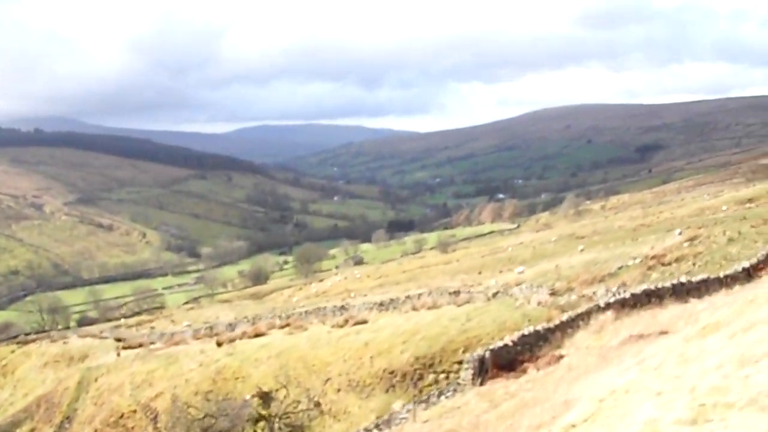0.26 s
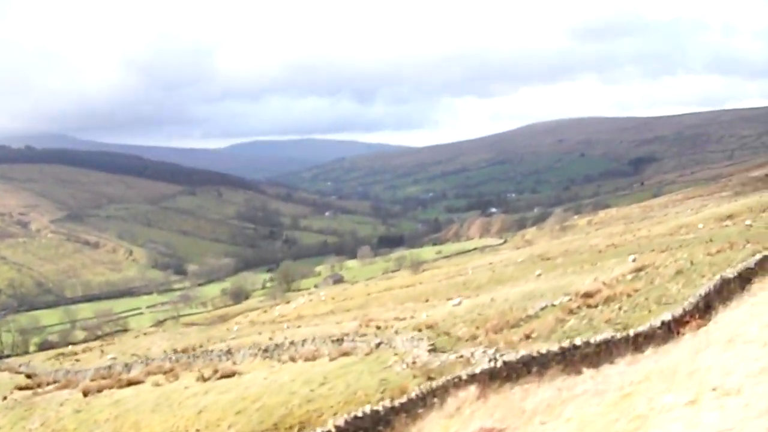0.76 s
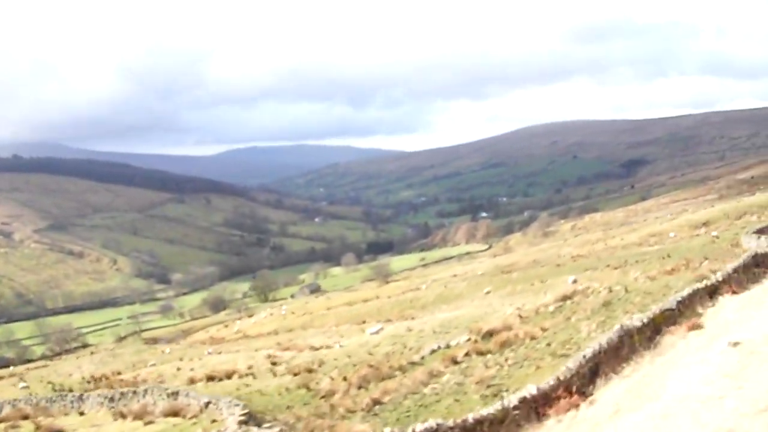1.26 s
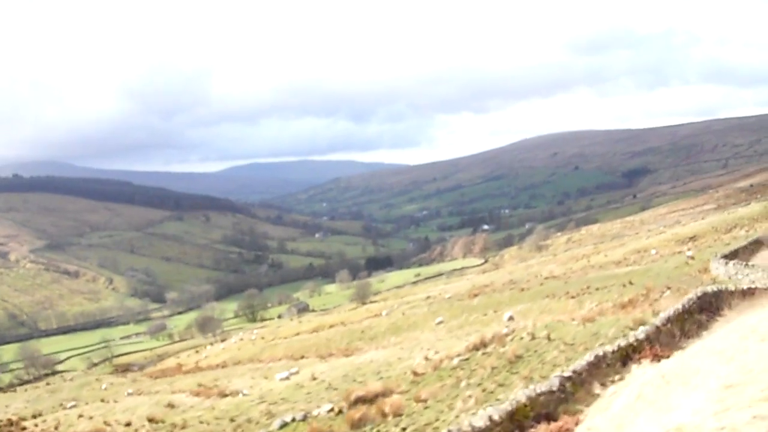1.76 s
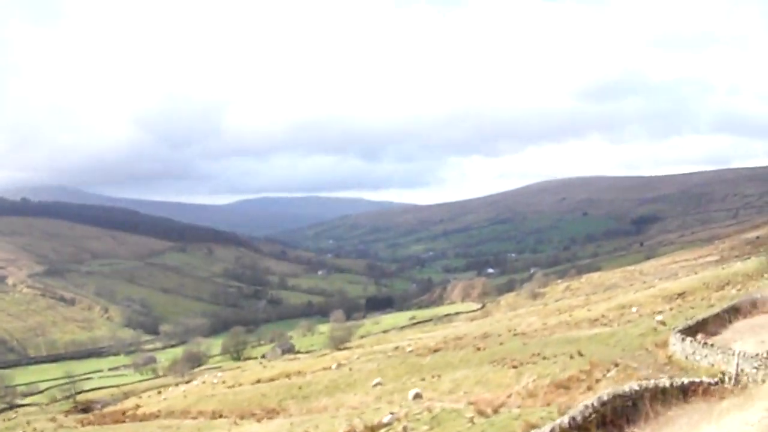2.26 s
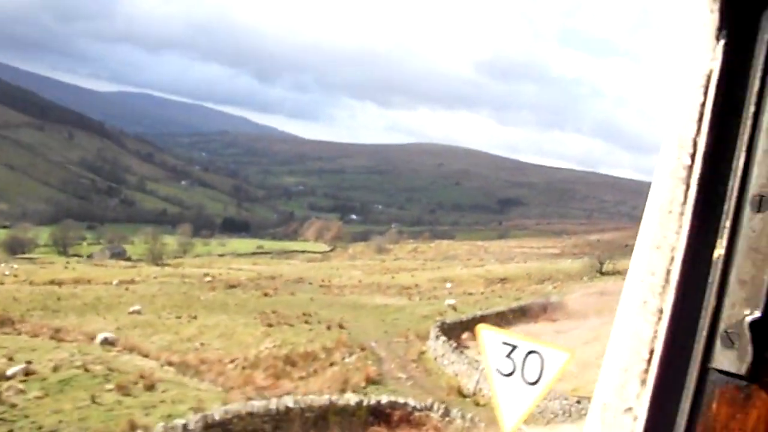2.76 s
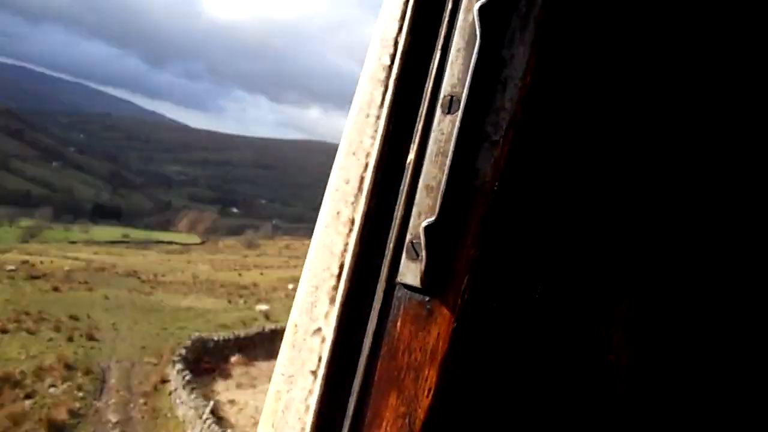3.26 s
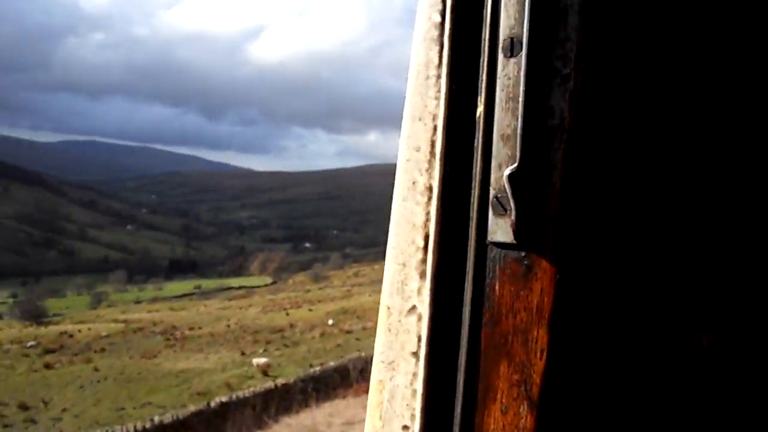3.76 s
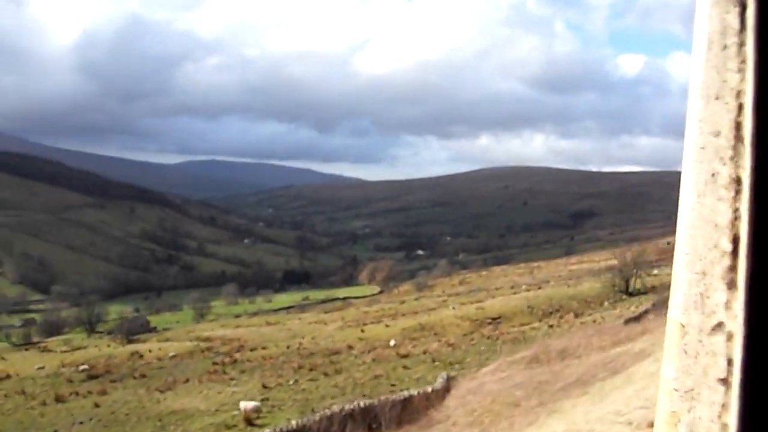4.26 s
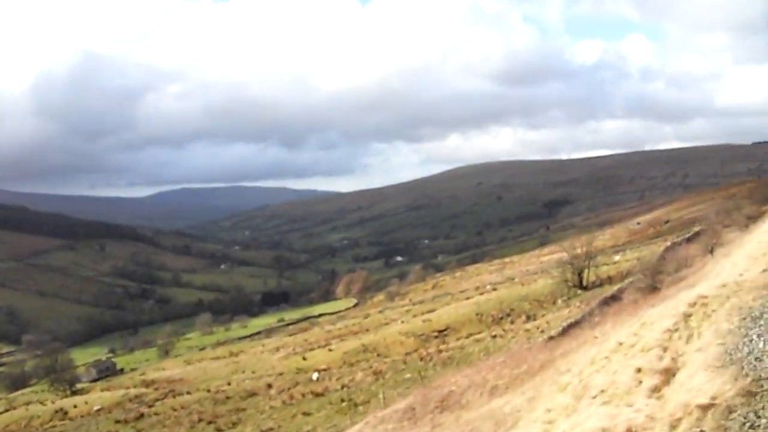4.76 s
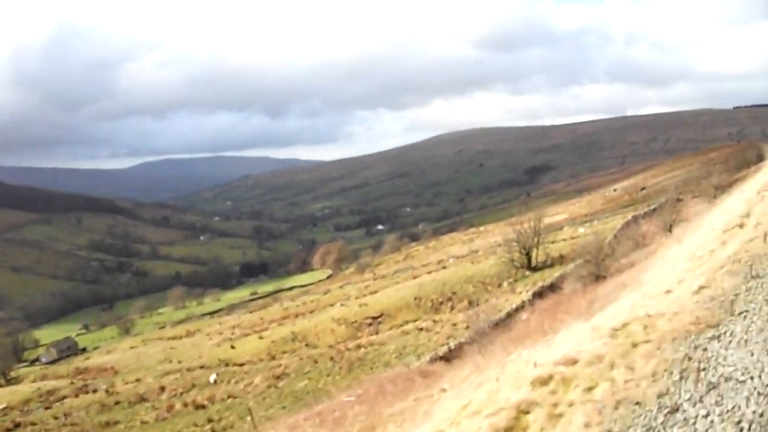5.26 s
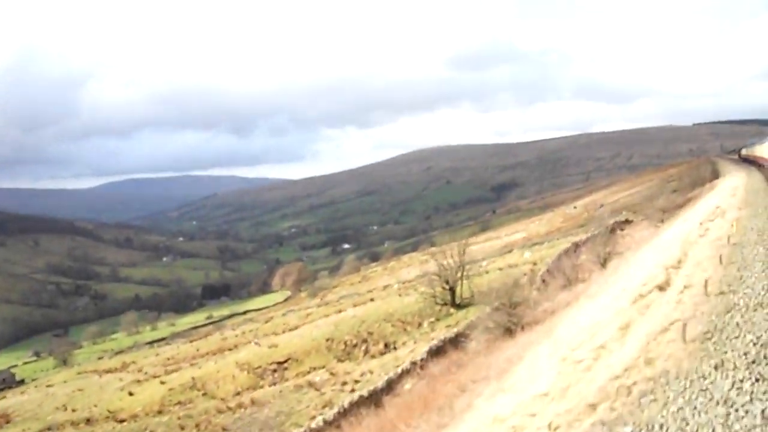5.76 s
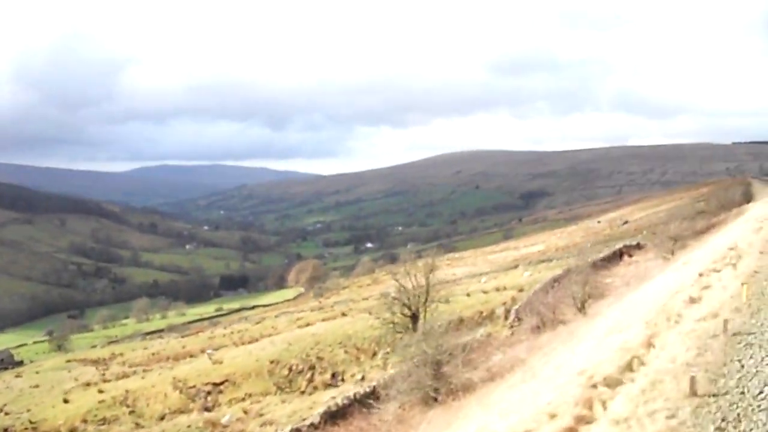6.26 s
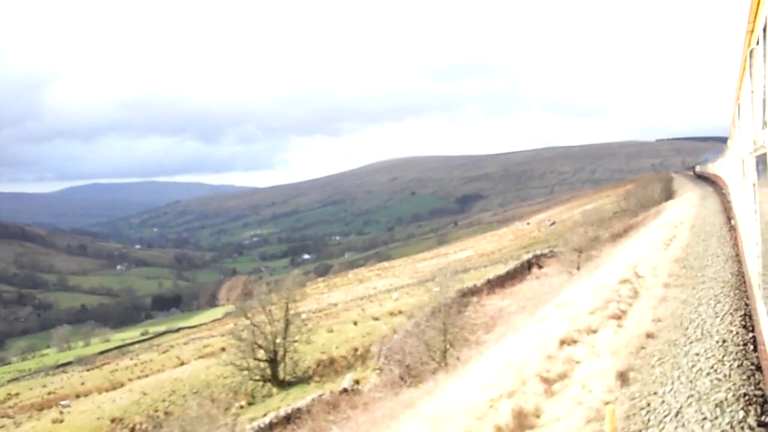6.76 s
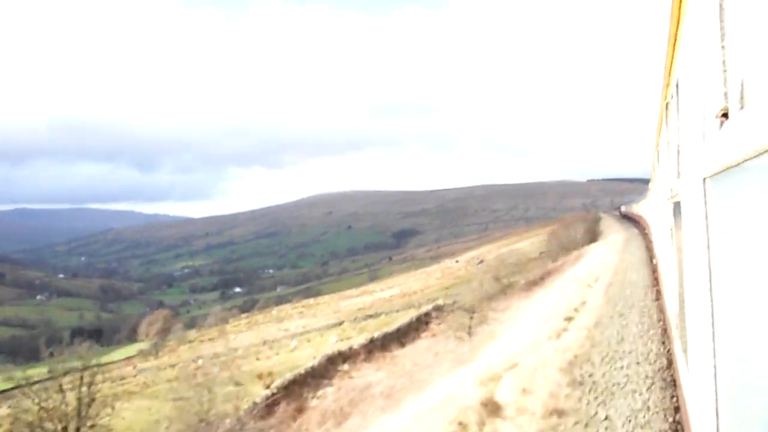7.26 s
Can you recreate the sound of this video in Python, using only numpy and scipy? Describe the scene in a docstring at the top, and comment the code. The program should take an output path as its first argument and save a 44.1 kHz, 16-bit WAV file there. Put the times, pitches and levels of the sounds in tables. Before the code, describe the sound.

Rough wind blasts and rasps on a microphone outside a moving train window, ducks away to soft carriage rolling, then roars back harder.

```python
"""Rough wind buffets and rasps on a stereo microphone held out of the window of a moving train.
Turbulent air presses on each port on its own: spectra of big and small eddies are swept past it at the air's speed,
and overload drives the capsule into its stops. Dry crackles mark the flow snapping onto a port.
For a while the window frame shelters the ports and the rolling of the carriage shows: resonant noise, with a hum.
"""
import sys
import numpy as np
from scipy import signal
from scipy.fft import rfft, irfft, next_fast_len
from scipy.io import wavfile
from scipy.ndimage import uniform_filter1d, map_coordinates

SR = 44100
rng = np.random.default_rng(int(sys.argv[2]) if len(sys.argv) > 2 else 0)


def transcribe(u):
    """Save the signal u as a 16-bit wav file named by the first command-line argument.

    u: samples, shape (n,) or (channels, n), limited to [-1, 1]; the rate is SR.
    q: integer samples, one column per channel.
    """
    v = np.clip(np.atleast_2d(u).T, -1, 1)
    q = np.round(v * 32767).astype(np.int16)
    wavfile.write(sys.argv[1], SR, q)


N = 331632  # samples in the scene


def amp(db):
    """Level to pressure ratio: 20 dB is a factor of ten."""
    return 10 ** (np.asarray(db) / 20)


def unit(x):
    """Normalisation to a root-mean-square of 1."""
    return x / np.sqrt(np.mean(x ** 2) + 1e-20)


def along(points, hz):
    """Linear interpolation of (Hz, value) points on a logarithmic frequency axis."""
    f, v = np.transpose(points)
    return np.interp(np.log(hz + 1), np.log(f + 1), v)


def curves(rows):
    """Linear interpolation in time: one value per sample for each column after the seconds."""
    seconds, *columns = np.transpose(rows)
    t = np.arange(N) / SR
    return [np.interp(t, seconds, column) for column in columns]


def wobble(rate):
    """Slow random modulation: a spline through independent normal knots, rate of them a second."""
    knots = rng.standard_normal(int(N * rate / SR) + 4)
    return map_coordinates(knots, [np.arange(N) * rate / SR])


def flicker(rate):
    """Random telegraph-like modulation: a level that jumps at irregular moments, about rate times a second."""
    jumps = np.cumsum(rng.random(N) < rate / SR)
    levels = rng.standard_normal(N + 1)
    return uniform_filter1d(levels[jumps], size=30)


def filtered(x, response):
    """Linear filtering: the spectrum is multiplied by a response, a function of frequency in Hz."""
    m = next_fast_len(x.shape[-1] + 8192)
    spectrum = rfft(x, m) * response(np.fft.rfftfreq(m, 1 / SR))
    return irfft(spectrum, m)[..., :x.shape[-1]]


def wind(port, side, full_db, tear_db, swell_db, coarse, buffet_full_db):
    """Turbulent pressure on one port; flow over its edge tears off and re-attaches, less so when it is strong."""
    # Pressure spectra of the eddies at full air speed, before scaling to rms 1.
    # Each row: frequency in Hz, relative level in dB per Hz.
    big_eddies = [(10, -9), (35, 1), (70, 1), (130, -4.5), (400, -29), (1500, -47), (20000, -83)]
    small_eddies = [(10, -5.5), (100, -2), (380, 0), (700, -5), (1500, -12.5), (6000, -28.5), (11000, -37),
                    (20000, -68.5)]
    # Moments when the flow lets go of the right port. Each row: start in seconds, length in ms.
    lulls = [(0.242, 9.2), (0.394, 10.2), (0.437, 11.3), (0.5, 8.2), (0.585, 10.1), (0.727, 5.9), (1.4, 7),
             (1.889, 9), (1.989, 7.28), (2.157, 8.95), (2.235, 5.97), (4.966, 31.7)]
    lull_db = -6

    buffet_db, calm_db = curves(port)
    calm_power = amp(2 * (calm_db + swell_db * wobble(35)))
    rasp_db = 10 * np.log10(calm_power + gusts(side))

    unsteady = np.clip(-rasp_db / 18, .5, 1.1)
    tearing = coarse * flicker(rate=150) + .8 * flicker(rate=450)
    kicks = flicker(rate=650)
    # the air lurches for a millisecond or two
    lurches = .25 * kicks + .8 * np.clip(kicks - 1.2, 0, 1.1)
    jerks = 2 ** (unsteady * lurches)

    lull_gate = held([(s, s + ms / 1000, 0, 0) for s, ms in lulls])
    letting_go = lull_db * (side < 0) * lull_gate
    rasp_db = rasp_db + tear_db * unsteady * tearing + letting_go

    buffet = eddies(big_eddies, buffet_db + 1.8 * wobble(14), buffet_full_db, octave_db=21, jerks=jerks)
    rasp = eddies(small_eddies, rasp_db, full_db, octave_db=12., jerks=jerks)
    return buffet + rasp


def eddies(spectrum, level_db, full_db, octave_db, jerks):
    """Frozen turbulence: a fixed pressure pattern is swept past the port, so faster air is louder and higher."""
    noise = rng.standard_normal(3 * N)
    pattern = unit(filtered(noise, lambda hz: amp(along(spectrum, hz))))
    # speed is 1 at full_db and doubles with every octave_db, apart from the jerks
    speed = np.clip(2 ** ((level_db - full_db) / octave_db) * jerks, .02, 2.5)
    position = np.cumsum(speed)
    return amp(level_db) * map_coordinates(pattern, [position])


def gusts(side):
    """Incoherent addition: the powers of the gusts and puffs that make one port rasp are summed."""
    # Gusts that strike one port and hold. Each row: start in seconds, end in seconds,
    # port (1 left, -1 right), rasp level in dB at the start and at the end, before tearing.
    gust_rows = [(0.0, 0.178, 1, -19, -19), (1.541, 1.765, 1, -13, -15), (2.103, 2.15, -1, -11, -18),
                 (2.104, 2.16, 1, -19, -22), (2.19, 2.302, -1, -18, -19), (4.788, 4.963, -1, -19, -15),
                 (4.841, 4.939, -1, -16, -17.5), (5.077, 5.255, 1, -11, -14), (5.105, 5.205, 1, -10, -8),
                 (5.297, 5.453, 1, -1, -9), (5.464, 5.633, 1, -3, -10), (5.64, 6.77, 1, -11, -10),
                 (5.7, 5.751, -1, -20, -17), (5.699, 5.89, 1, -4, -4), (5.9, 6.691, 1, -6, -11),
                 (6.805, 6.978, 1, -8, -7), (6.853, 6.919, 1, -8, -8), (6.998, 7.015, 1, -11.5, -12.5),
                 (7.034, 7.046, 1, -7, -9), (7.056, 7.166, 1, -9.5, -10.5), (7.252, 7.3, 1, -5, -9.5),
                 (7.356, 7.376, 1, -13, -8.5), (7.381, 7.408, 1, -7.5, -10.5),
                 (7.488, 7.52, 1, -18.5, -17.5)]
    # Short puffs on one port. Each row: start in seconds, port (1 left, -1 right), length in ms,
    # rasp level in dB at the start, before tearing.
    puff_rows = [(0.033, 1, 9.2, -12), (0.057, 1, 13.2, -11), (0.085, 1, 11.8, -14), (0.125, 1, 7.8, -15),
                 (0.158, 1, 19, -14), (0.197, 1, 4.5, -17), (0.261, 1, 13.3, -21), (0.339, 1, 8.3, -20),
                 (0.406, 1, 9.5, -19), (0.495, 1, 9.6, -19), (0.568, 1, 15.6, -17), (0.635, 1, 8.2, -16),
                 (0.654, 1, 14.1, -17), (0.682, 1, 12.5, -12), (0.723, 1, 5.9, -19), (0.982, 1, 11.8, -21),
                 (1.002, 1, 10.4, -19), (1.103, 1, 17, -20), (1.205, 1, 14.7, -15), (1.275, 1, 12.5, -15),
                 (1.319, 1, 11.6, -19), (1.373, 1, 14, -21), (1.583, 1, 16.7, -8), (1.851, 1, 10, -15),
                 (1.9, 1, 22.2, -19), (1.962, 1, 12.6, -17), (2.308, 1, 13.8, -25), (2.485, 1, 6.2, -21),
                 (2.512, 1, 7.6, -18), (2.546, 1, 19, -19), (2.578, -1, 16.7, -23), (2.639, 1, 9.6, -18),
                 (2.722, 1, 4.95, -23), (2.772, 1, 11, -19), (2.79, 1, 23.5, -18), (2.86, 1, 12.3, -25),
                 (4.195, 1, 16.7, -29), (4.315, 1, 18, -27), (4.453, 1, 8.5, -23), (4.54, 1, 7.8, -16),
                 (4.551, 1, 13, -18), (4.6, 1, 12, -17), (4.62, 1, 16, -16), (4.672, 1, 11.6, -20),
                 (4.73, 1, 7, -16), (4.733, -1, 5.5, -15), (5.428, -1, 7.6, -14), (5.462, -1, 17, -19),
                 (5.578, -1, 8.1, -19), (5.635, -1, 5, -16), (5.807, -1, 17.2, -18), (6.12, -1, 7.8, -15),
                 (6.785, 1, 16, -13), (7.013, -1, 5.85, -18.5), (7.044, -1, 19, -20), (7.18, 1, 7.6, -15.5),
                 (7.21, 1, 9.1, -13.5), (7.211, -1, 8.4, -18), (7.242, -1, 15, -17), (7.325, 1, 20, -18.5),
                 (7.362, -1, 11.7, -16), (7.417, 1, 8.1, -10), (7.438, 1, 10.5, -15.5), (7.455, -1, 5, -17)]
    puff_fade_db = -5  # a puff is strongest at its start

    long = [(start, end, first, last) for start, end, port, first, last in gust_rows if port * side > 0]
    short = [(s, s + ms / 1000, db, db + puff_fade_db) for s, port, ms, db in puff_rows if port * side > 0]
    return held(long + short)


def held(rows):
    """Power addition of stretches given as (start s, end s, first dB, last dB)."""
    power = np.zeros(N)
    for start, end, first_db, last_db in rows:
        span = slice(round(start * SR), round(end * SR))
        power[span] += amp(2 * np.linspace(first_db, last_db, len(power[span])))
    return edged(power)


def edged(x):
    """Finite response time of the flow: a running mean turns sudden steps into short slopes."""
    edge_s = .003  # how fast the flow takes hold or lets go
    return np.abs(uniform_filter1d(x, max(round(edge_s * SR), 1)))


def snaps():
    """Impulsive re-attachment: flow snapping onto a port gives decaying dull noise over a pull of suction."""
    # Dry crackles. Each row: start in seconds, noise level in dB before the final 6 dB boost,
    # left minus right in dB.
    crackles = [(2.46, -47, -10), (2.557, -39, 19), (2.642, -24, 20), (2.7772, -26.5, 25),
                (4.541, -31.5, 15), (4.6049, -42, 20), (4.6261, -37, 24), (4.6559, -32, 13),
                (4.6752, -39, 20), (4.732, -31, 10), (4.7891, -34, -12), (4.788, -43, -12),
                (5.0193, -28.5, -8), (5.0395, -23, -12), (7.2153, -57, 16), (7.2305, -24, 14),
                (7.4551, -36, 5)]
    suck_s, suck_db = 0.0007, 14.5  # time of deepest suction, and its level above the noise
    out, t = np.zeros((2, N + 400)), np.arange(400) / SR
    for s, db, pan_db in crackles:
        dull = unit(signal.lfilter([1], [1, -1.5, .56], rng.standard_normal(len(t))))
        burst = amp(db - 60 * t / .012) * dull  # falls 60 dB in 12 ms
        burst -= amp(db + suck_db) * t / suck_s * np.exp(1 - t / suck_s)
        port_gain = amp(6 + np.minimum([[pan_db], [-pan_db]], 0))  # only the farther port is turned down
        out[:, round(s * SR):][:, :len(t)] += burst * port_gain
    return out[:, :N]


def rolling():
    """Modal resonance and partial coherence: wheel and rail noise, most alike on both ports near a body mode."""
    # Wheels and rails. Each row: frequency in Hz, relative level in dB per Hz.
    wheel_noise = [(71, -5), (120, -52), (218, -45), (259, -6), (345, -1), (388, -10), (527, -12.5),
                   (603, -5), (1520, -23), (2100, -18.5), (3820, -24), (9420, -41), (11900, -55),
                   (15400, -82), (22000, -120)]
    # Carriage resonances. Each row: frequency in Hz, width in Hz, relative level in dB.
    body_modes = [(265, 41, -1), (672.9, 220, -5), (2100, 120, -31)]
    # Coherence of the ports. Each row: frequency in Hz, left-right likeness (1 is identical).
    likeness = [(60, 0.088), (220, 1), (830, 0.44), (3070, 0.11), (11400, -0.16)]
    # Balance of the ports. Each row: frequency in Hz, left minus right in dB.
    balance = [(60, -18), (350, -0.5), (1990, 4), (11400, 4)]
    # The wheels are heard better out in the open.
    # Each row: time in seconds, left change in dB, right change in dB.
    in_the_open = [(0.0, -0.5, 1), (2.6, 1.5, 1.5), (2.9, 1, 0), (4.5, 0, 1), (4.8, 0, 5), (7.52, 1, 6.5)]

    def ring(f):
        """Modal superposition: direct sound plus damped second-order resonances."""
        return 1 + 0.57 * sum(amp(db) * 1j * f * w / (c * c - f * f + 1j * f * w) for c, w, db in body_modes)

    def colour(hz):
        """Coherence rule: mid and side share the power so that the ports are as alike as the table says."""
        turn = np.arccos(np.clip(along(likeness, hz), -1, 1)) / 2
        return amp(along(wheel_noise, hz)) * ring(hz) * [np.cos(turn), np.sin(turn)]

    mid, side = filtered(rng.standard_normal((2, N)), colour)
    ports = np.array([mid + side, mid - side])
    pair = filtered(ports, lambda hz: amp(np.outer([.5, -.5], along(balance, hz))))
    swaying_db = .8 * wobble(5) + .8 * wobble(14)
    return amp(-41.5 + swaying_db + np.array(curves(in_the_open))) * unit(pair)


def hum():
    """Narrow-band resonance: noise through one hum of the carriage, the same on both ports."""
    # One row: centre in Hz, distance in Hz at which the amplitude response halves, rms level in dB.
    resonance = (345, 5, -52)
    hz, width, db = resonance
    noise = rng.standard_normal(N)
    return amp(db) * unit(filtered(noise, lambda f: 1 / (1 + ((f - hz) / width) ** 2)))


def tick():
    """Impulsive excitation: differenced noise makes a short bright, faint crack, nearer the right port."""
    # Each row: start in seconds, level in dB before differencing and the gains of the two ports.
    cracks = [(3.8807, -44)]
    out, t = np.zeros(N + 400), np.arange(400) / SR
    for s, db in cracks:
        bright = np.diff(rng.standard_normal(len(t) + 1))
        out[round(s * SR):][:len(t)] += amp(db - 60 * t / .006) * bright  # falls 60 dB in 6 ms
    return out[:N] * amp([[-6], [2.5]])


def scene():
    """Superposition of pressures: unrelated wind on the two ports over the train's own noise."""
    # Slow wind at each port, between the gusts.
    # Each row: time in seconds, buffet level in dB, rasp level in dB, both before random swelling.
    left_port = [(0.0, -24, -26), (0.18, -20, -27), (0.45, -24, -29), (0.68, -26, -24), (0.85, -26, -32),
                 (1.3, -28.5, -25), (1.48, -24, -30), (1.7, -19, -22), (1.95, -28.5, -25), (2.15, -21, -25),
                 (2.44, -24, -34), (2.52, -18, -30), (2.68, -16, -32), (2.76, -23, -33), (2.88, -18, -35),
                 (3.0, -26, -46), (3.43, -36.5, -46), (3.85, -29, -46), (4.03, -35.5, -46),
                 (4.13, -32, -45), (4.19, -22, -37), (4.42, -22, -33), (4.52, -17, -30), (4.78, -17, -28),
                 (5.03, -25.5, -27), (5.3, -26, -17), (5.95, -30.5, -17), (6.7, -26.5, -20),
                 (7.2, -27, -24), (7.38, -20.5, -21.5), (7.52, -29.5, -20)]
    right_port = [(0.0, -18, -18), (0.6, -17, -19), (0.68, -15.5, -16.5), (1.0, -13, -16.5),
                  (1.3, -16.5, -16), (1.45, -19, -18), (1.67, -16, -14), (1.8, -22.5, -18),
                  (2.06, -21, -21), (2.3, -23, -21), (2.57, -23, -28), (2.73, -36.5, -45.5),
                  (3.0, -47, -46), (4.4, -48, -46), (4.62, -38, -48), (4.76, -19, -23), (4.95, -14.5, -23),
                  (5.3, -19, -21), (5.5, -20, -26), (5.73, -18, -22), (5.9, -23, -26.5), (6.12, -23, -26),
                  (6.25, -30, -33.5), (6.6, -36, -34), (6.84, -21.5, -32), (6.92, -28.5, -30),
                  (7.04, -18, -28), (7.12, -26.5, -30.5), (7.36, -17, -25.5), (7.52, -20, -29.5)]
    left = wind(left_port, side=1, full_db=-6, tear_db=2.08, swell_db=2.5, coarse=.9, buffet_full_db=-21)
    right = wind(right_port, side=-1, full_db=-10.0, tear_db=1.21, swell_db=0.54, coarse=.6,
                 buffet_full_db=-13)
    return np.array([left, right]) + rolling() + snaps() + hum() + tick()


def record(dry):
    """Asymmetric saturation, sooner and harder on pressure than on suction; then linear response and band limit."""
    # Capsule response. Each row: frequency in Hz, gain in dB.
    capsule = [(8, 4.5), (25, -2), (9000, -1), (10300, 0.5), (11500, -12.5), (12000, -17)]
    vent_hz, top_hz = 9.3, 11950  # steady pressure leaks away, so held tops sag; nothing passes from top_hz up

    stop = np.where(dry > 0, .32, .72)
    knee = np.where(dry > 0, 6.5, 2.2)
    limited = dry / (1 + np.abs(dry / stop) ** knee) ** (1 / knee)
    moved = limited + 0.021 * dry  # the stops yield a little

    def response(hz):
        """First-order pressure leak times the capsule's gain, cut off at the band limit."""
        return amp(along(capsule, hz)) * 1j * hz / (vent_hz + 1j * hz) * (hz < top_hz)

    return filtered(moved, response)


dry = scene()
out = record(dry)
transcribe(out)
```